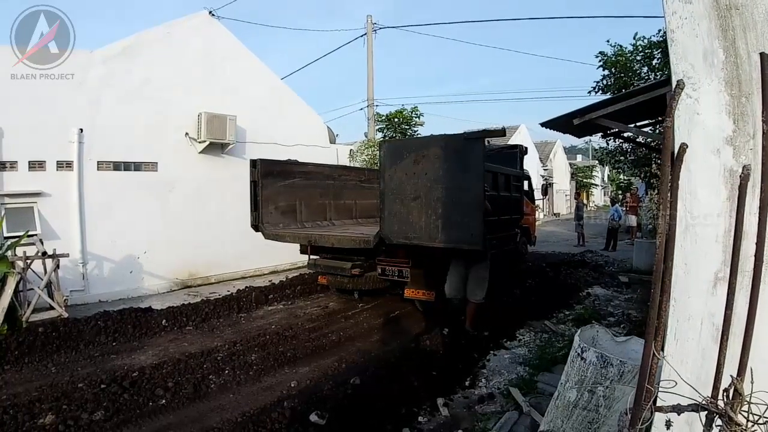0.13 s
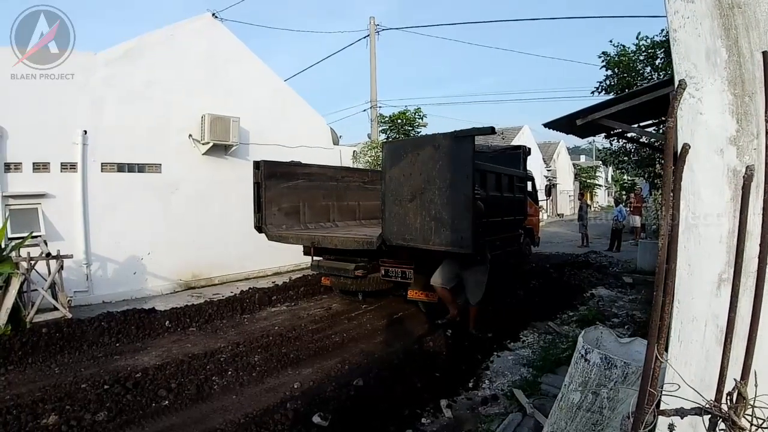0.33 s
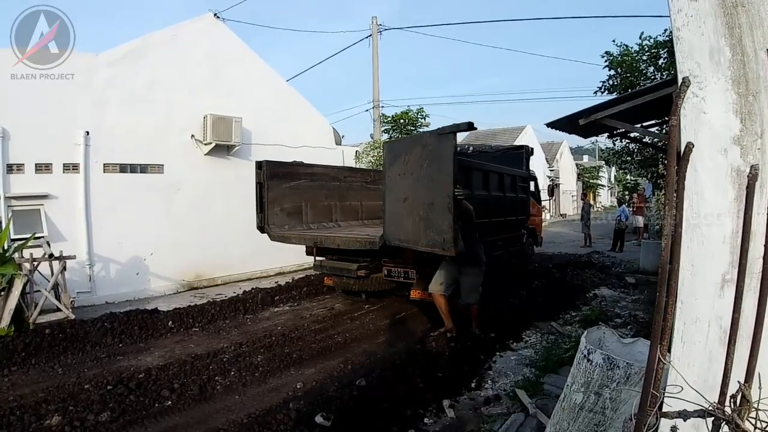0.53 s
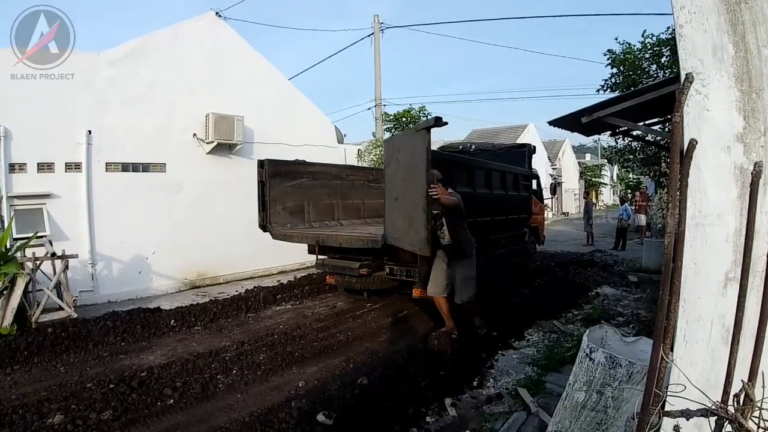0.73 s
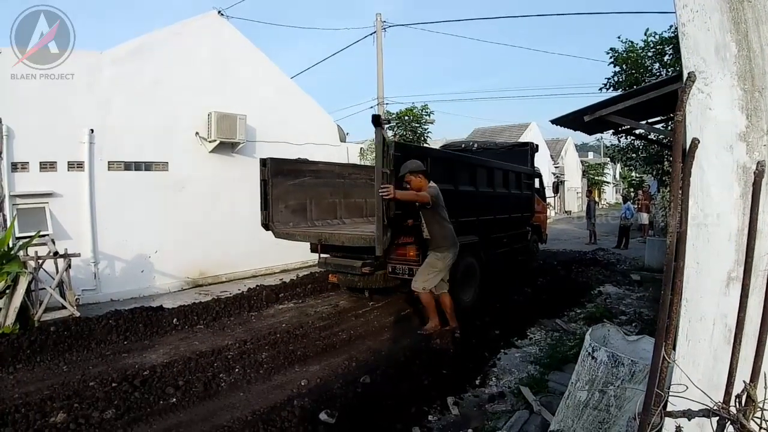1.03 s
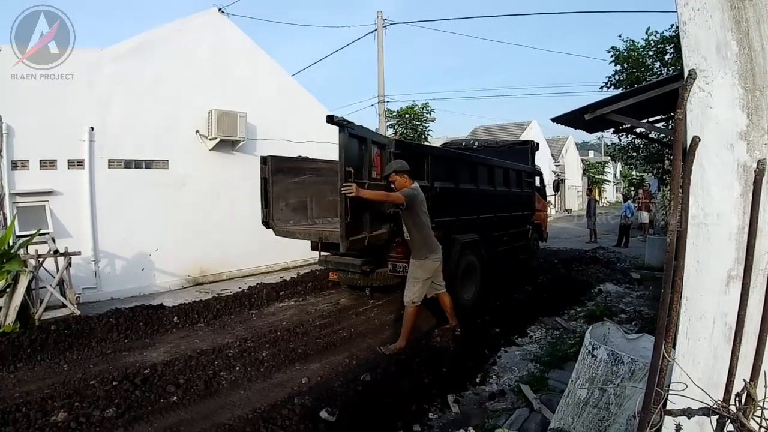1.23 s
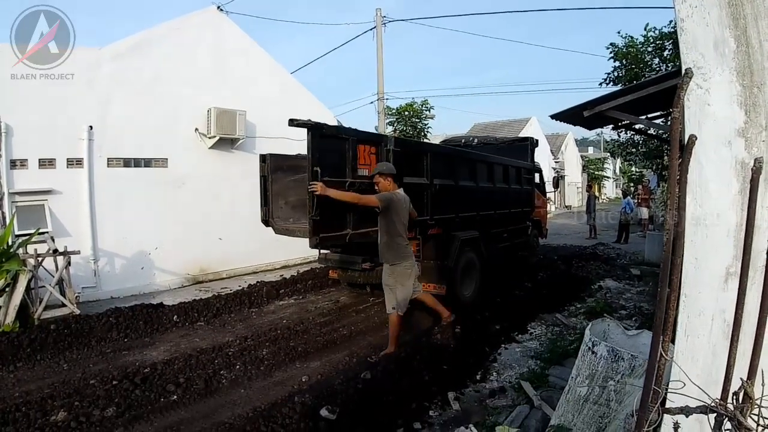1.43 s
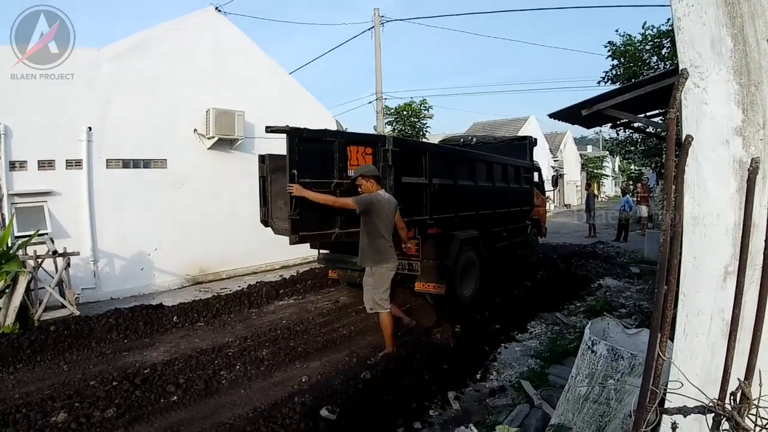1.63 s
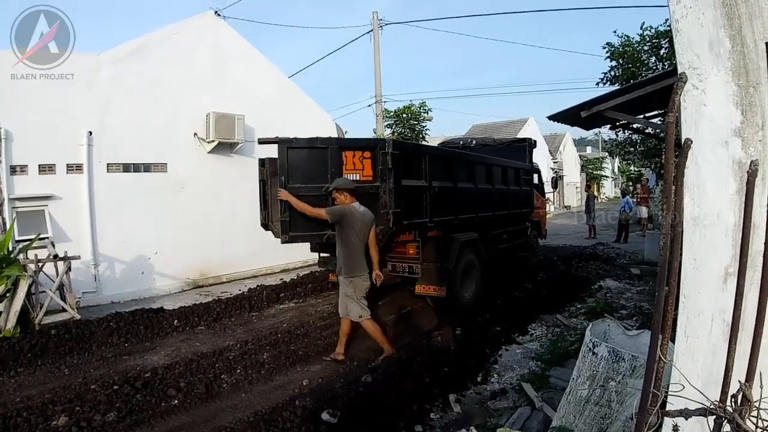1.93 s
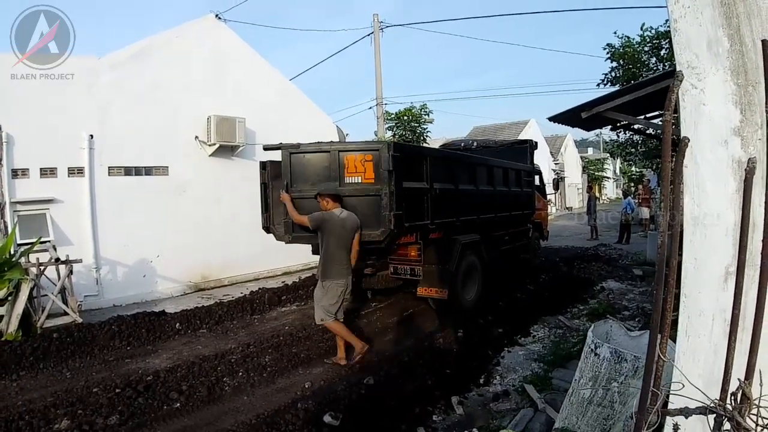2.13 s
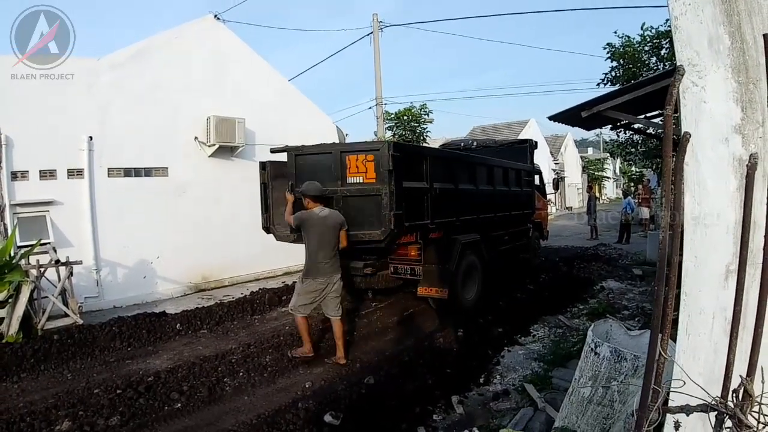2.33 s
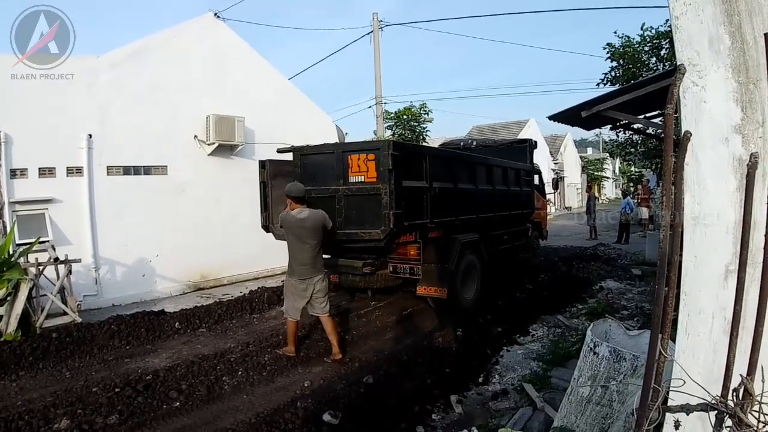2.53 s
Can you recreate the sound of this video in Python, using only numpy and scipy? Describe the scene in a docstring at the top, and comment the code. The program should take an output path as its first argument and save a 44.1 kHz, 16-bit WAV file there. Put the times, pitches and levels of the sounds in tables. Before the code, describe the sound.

A heavy steel tailgate slams almost at once in a tight flurry of contacts, overloading the microphone, then rings down between walls; latch metal clinks follow in two small clusters while a diesel engine idles throughout.

```python
"""Tailgate slam in a walled lane

A heavy steel tailgate slams against a truck body in a flurry of contacts and rings out as decaying modes
over a dense clang of filtered noise. A loose latch chain clinks faintly before and clearly afterwards, as
dying sines and rattle. A four-cylinder diesel idles throughout: crank orders, drones and knocking noise.
The lane's walls answer the steel with echoes, and the slam overloads the microphone.
"""
import sys
import numpy as np
from scipy import signal
from scipy.fft import rfft, irfft
from scipy.io import wavfile
from scipy.ndimage import uniform_filter1d

SR = 44100
rng = np.random.default_rng(int(sys.argv[2]) if len(sys.argv) > 2 else 0)


def generate_wav(signal):
    """Clip the signal to [-1, 1] and save it as 16-bit WAV at the path in sys.argv[1]."""
    frames = np.transpose(np.atleast_2d(signal))
    scaled = np.clip(frames, -1, 1) * 32767
    pcm = np.round(scaled).astype(np.int16)
    wavfile.write(sys.argv[1], SR, pcm)


def amplitude_ratio(level_db):
    """Convert a level in decibels to the matching linear amplitude (field) ratio."""
    exponent = np.asarray(level_db, float) / 20
    return 10 ** exponent


N = 119070  # length in samples

# Sine orders of the crank. Each row: multiple of the crank rate, level in dB.
CRANK_ORDERS = [(.5, -53), (1, -45), (2, -21), (3, -37), (4, -36), (5, -43), (6, -53), (7, -54), (10, -51),
                (12, -52), (14, -50)]
# Steady tones of accessories and panels. Each row: frequency in Hz, level in dB.
DRONES = [(40.9, -34), (49.4, -37), (100.4, -46), (163.6, -50), (200.7, -54)]
# Knock strength of the four cylinders in firing order, in relative dB.
CYLINDERS = [0, -3, -.6, -4.5]
# Colour of engine noise and lane hiss. Each row: frequency in Hz, relative level in dB per Hz.
NOISE_COLOUR = [(36, -28), (62, -9), (96, -14.5), (157, -16), (427, -26), (877, -28.5), (1270, -34.5),
                (1500, -30.5), (3620, -42), (4360, -41), (10300, -51), (12700, -56.5), (14900, -54),
                (16000, -64)]
# Extra colour of the noise that pulses with the firings. Each row: frequency in Hz, gain in dB.
KNOCK_COLOUR = [(150, -30), (500, -10), (900, 4.5), (2500, -1.5), (6000, -4), (12000, -1)]
# Narrow bands that stand out of the steady hiss. Each row: frequency in Hz, width in Hz, gain in dB.
WHISTLES = [(7150, 250, 3.5), (10550, 300, 3.)]
# Latch clinks. Each row: start in seconds, strength in dB, brightness in dB per octave, rise in seconds.
CLINKS = [(0.166, -54, 0, 0.0018), (.686, -39.5, -4, .002), (.699, -42, -6, .002), (.724, -47, -7, .003),
          (1.513, -35, 1.5, .0015), (1.586, -41, -1.5, .0015), (1.600, -44, -6, 0.0034),
          (1.765, -55, -2.5, .003)]
# Clear modes of the latch. Each row: frequency in Hz, relative level in dB, T60 in seconds.
LATCH_MODES = [(3350, -8, .12), (3900, -4, .06), (4040, -12, .25), (4340, -6, .16), (5140, -14, .25),
               (5300, -9, .15), (5650, 0, .06), (7250, -18, .3), (7780, -11, .1), (10060, -17, .85),
               (13560, -27, .2)]
# Colour of the latch rattle. Each row: frequency in Hz, relative level in dB per Hz.
RATTLE_COLOUR = [(250, -60), (600, -16), (1500, -9), (2600, -11), (4300, 2), (5500, -1.5), (8000, -9),
                 (14000, -24)]
# Tailgate contacts. Each row: start in seconds, strength in dB, brightness in dB per octave, rise in seconds.
BLOWS = [(.179, -22, 1, .001), (.1835, 0, 1, .0015), (.263, -13, 3.5, .003), (.197, -5, 0, .003),
         (.226, -9, -3, .008)]
# Clear modes of gate and truck bed. Each row: frequency in Hz, relative level in dB, T60 in seconds.
GATE_MODES = [(100.6, -23, .8), (117.3, -26, .6), (129.8, -26, 1.1), (151, -28, .6), (164, -29, .8),
              (196.8, -19, .5), (211.7, -22, .95), (255.3, -33, 1.1), (277.2, -33, 1.6), (300.8, -36, 2.6),
              (318.6, -32, 2.1), (332.8, -41.5, 9.), (338.5, -38, 2.2), (397.5, -24, 1.4), (426.6, -31, 1.),
              (463.2, -28, .8), (473.6, -26, .7), (586.5, -29, .8), (643.3, -42, 2.), (656.1, -33, 1.4),
              (767.9, -26, .7), (836.8, -29, .6), (910.5, -24, .7), (971.4, -28, 1.05), (1022.8, -25, .65),
              (1137, -30, .55), (1210, -24, .35), (1398, -29, .6), (1626, -29, .6), (1700, -26, .5),
              (2343, -28, .3), (2620, -27, .3), (3355, -30, .3)]
# Colour of the gate's crowd of close modes. Each row: frequency in Hz, relative level in dB per Hz.
CLANG_COLOUR = [(40, -32), (70, -15), (150, -4), (500, -7), (1000, -2), (1900, -2.5), (2600, -5),
                (3700, -7), (6500, -15.5), (8500, -15), (13500, -18), (16000, -24)]
# Decay of the clang. Each row: frequency in Hz, T60 in seconds.
CLANG_DECAY = [(80, 0.78), (250, .8), (700, 0.85), (1500, .5), (4000, .34), (8000, .22), (14000, .15)]
# Decay of the lane's echoes. Each row: frequency in Hz, T60 in seconds.
LANE_DECAY = [(100, 0.67), (1000, 0.64), (4000, 0.44), (12000, 0.19)]

BUILD_CYCLES = 3.5  # a clear mode's own cycles added to its rise time


def evened(x):
    """Scales x to unit rms."""
    return x / np.sqrt(np.mean(x ** 2) + 1e-20)


def read(points, hz):
    """Reads a curve of (Hz, value) points along a log frequency axis."""
    f, value = np.transpose(points)
    return np.interp(np.log(hz + 1), np.log(f + 1), value)


def coloured(x, db_of_hz):
    """Filters x by a gain in dB given per frequency."""
    hz = np.fft.rfftfreq(len(x), 1 / SR)
    return irfft(rfft(x) * amplitude_ratio(db_of_hz(hz)), len(x))


def wander(rate_hz, count=24):
    """Slow random curve of unit rms: sines up to rate_hz, the slower ones stronger."""
    rates = np.geomspace(rate_hz / 20, rate_hz, count)
    t = np.arange(0, N + 256, 256) / SR
    slow = sum(np.sin(2 * np.pi * (f * t + rng.random())) / np.sqrt(f) for f in rates)
    return np.interp(np.arange(N) / SR, t, evened(slow))


def add(mix, start_s, sound):
    """Lays a sound into the mix in place, cut off at the end."""
    part = mix[round(start_s * SR):][:len(sound)]
    part += sound[:len(part)]


def engine():
    """Crank orders and drones as wavering sines; noise whose middle band knocks with each firing."""
    crank_hz, first_firing_s = 11.432, .0162
    t = np.arange(N) / SR - first_firing_s
    tones = np.zeros(N)
    for order, db in CRANK_ORDERS:
        phase = rng.random() * (order != 2)  # in turns; order 2 peaks on every firing
        level = np.sqrt(2) * amplitude_ratio(db + .5 * wander(3.7))
        tones += level * np.cos(2 * np.pi * (order * crank_hz * t + phase))
    for hz, db in DRONES:
        level = np.sqrt(2) * amplitude_ratio(db + .55 * wander(2.97))
        turns = hz * t + rng.random() + .049 * wander(2.74)
        tones += level * np.cos(2 * np.pi * turns)
    noise_db, knock_share = -38, .76  # overall rms level; gain of pulsing against steady noise
    return tones + amplitude_ratio(noise_db) * evened(knock_share * knocking(crank_hz, t) + hiss())


def knocking(crank_hz, t):
    """Each firing, two per crank turn, shapes a burst of noise with its cylinder's strength."""
    t60_s, rise_s, spread_db = .15, .0042, 1.14
    firings = 2 * crank_hz * t
    number = np.floor(firings).astype(int) + 4  # offset keeps the count positive
    chance_db = spread_db * rng.standard_normal(number.max() + 1)
    strength = amplitude_ratio(np.array(CYLINDERS)[number % 4] + chance_db[number])
    since = (firings % 1) / (2 * crank_hz)
    pulses = evened(strength * amplitude_ratio(-60 * since / t60_s) * (1 - np.exp(-since / rise_s)))
    return coloured(pulses * rng.standard_normal(N),
                    lambda hz: read(NOISE_COLOUR, hz) + read(KNOCK_COLOUR, hz))


def hiss():
    """Steady engine and lane noise, slowly wavering, with narrow whistling bands."""
    def colour_db(hz):
        peaks = sum(db * np.exp(-((hz - f) / width) ** 2) for f, width, db in WHISTLES)
        return read(NOISE_COLOUR, hz) + peaks
    return coloured(amplitude_ratio(.92 * wander(6.1)) * rng.standard_normal(N), colour_db)


def ring(modes, tilt_db, pivot_hz, rise_s, length_s):
    """Dying sines; each builds up over the contact and a few of its own cycles."""
    t = np.arange(0, length_s, 1 / SR)
    out = np.zeros(len(t))
    for hz, db, t60 in modes:
        fall = amplitude_ratio(db + tilt_db * np.log2(hz / pivot_hz) - 60 * t / t60)
        swell = 1 - np.exp(-t / (rise_s + BUILD_CYCLES / hz))
        out += np.sqrt(2) * fall * swell * np.sin(2 * np.pi * hz * t)
    return out


def crowd(colour, t60_of_hz, tilt_db, pivot_hz, rise_s, length_s):
    """Modes too close to tell apart: lumpy noise with clatter, every band dying at its own speed."""
    lumps_db, clatter_db = 2, 2  # random unevenness over frequency, and over time
    noise = rng.standard_normal(round(length_s * SR))
    hz, t, z = signal.stft(noise, SR, nperseg=512, noverlap=384)
    base = evened(amplitude_ratio(read(colour, hz)))
    lumps = amplitude_ratio(lumps_db * rng.standard_normal(len(hz)) + tilt_db * np.log2((hz + 60) / pivot_hz))
    clatter = amplitude_ratio(clatter_db * evened(uniform_filter1d(rng.standard_normal(z.shape), size=60, axis=0)))
    fall = amplitude_ratio(-60 * t / t60_of_hz(hz)[:, None])
    out = signal.istft(z * clatter * (base * lumps)[:, None] * fall, SR, noverlap=384)[1]
    return out * (1 - np.exp(-np.arange(len(out)) / SR / rise_s))


def latch():
    """Small steel parts clack: a short rattle around a few clear modes."""
    rattle_db, rattle_t60_s = -4, .24
    out = np.zeros(N)
    for start_s, db, tilt_db, rise_s in CLINKS:
        modes = ring(LATCH_MODES, tilt_db, 4740, rise_s, .8)
        rattle = crowd(RATTLE_COLOUR, lambda hz: np.full(len(hz), rattle_t60_s), tilt_db, 4400, rise_s, .4)
        add(out, start_s, amplitude_ratio(db) * modes)
        add(out, start_s, amplitude_ratio(db + rattle_db) * rattle)
    return out


def tailgate():
    """Each contact adds its energy to the clear modes and starts a dense clang."""
    clang_db, waver_db = -7, 1  # the gate's swing makes the modes waver
    held_s, held_t60_s = 1.56, .47  # a hand stills the gate
    t, out = np.arange(N) / SR, np.zeros(N)
    for hz, mode_db, t60 in GATE_MODES:
        energy = np.zeros(N)
        for start_s, db, tilt_db, rise_s in BLOWS:
            since = np.maximum(t - start_s, 0)
            swell = 1 - np.exp(-since / (rise_s + BUILD_CYCLES / hz))
            fall = amplitude_ratio(db + tilt_db * np.log2(hz / 700) - 60 * since / t60)
            energy += (fall * swell) ** 2
        level = np.sqrt(2 * energy) * amplitude_ratio(mode_db + waver_db * wander(5.03))
        out += level * np.sin(2 * np.pi * (hz * t + rng.random()))
    out *= amplitude_ratio(-60 * np.maximum(t - held_s, 0) / held_t60_s)
    for start_s, db, tilt_db, rise_s in BLOWS:
        clang = crowd(CLANG_COLOUR, lambda hz: read(CLANG_DECAY, hz), tilt_db, 1860, rise_s, 1.2)
        add(out, start_s, amplitude_ratio(db + clang_db) * clang)
    return out


def lane(x):
    """Walls answer with sparse echoes of random sign, treble dying first."""
    taps = np.zeros(SR)
    at = np.arange(500, SR - 20, 20)  # one echo at a random place in every 20 samples
    taps[at + rng.integers(0, 20, len(at))] = rng.choice([-1., 1.], len(at))
    hz, t, z = signal.stft(taps, SR, nperseg=256)
    fall = amplitude_ratio(-60 * t / read(LANE_DECAY, hz)[:, None])
    tail = signal.istft(z * fall, SR, nperseg=256)[1]
    return signal.fftconvolve(x, tail / np.linalg.norm(tail))[:N]


def scene():
    """Steel, its echoes from the lane and the idling engine, in mono."""
    lane_db = -15.5
    steel = tailgate() + latch()
    return (steel + amplitude_ratio(lane_db) * lane(steel) + engine())[None]


def roll_off(x):
    """The treble ends steeply here."""
    return signal.sosfilt(signal.butter(12, 16320, fs=SR, output="sos"), x)


def record(dry):
    """The microphone input clips flat at full scale when the slam overloads it."""
    overload = 1
    return roll_off(np.clip(dry, -overload, overload))


dry = scene()
out = record(dry)
generate_wav(out)
```